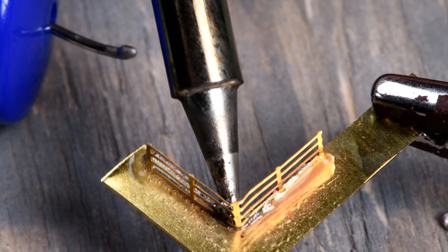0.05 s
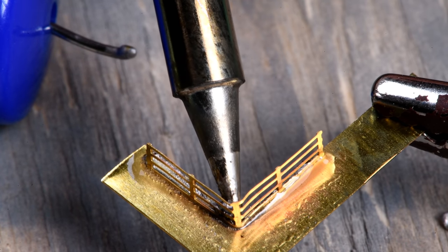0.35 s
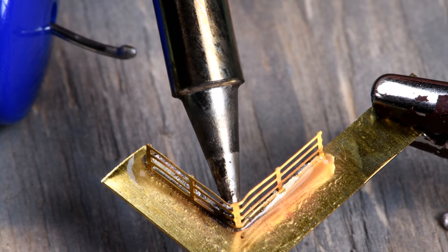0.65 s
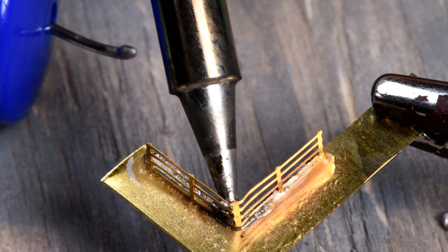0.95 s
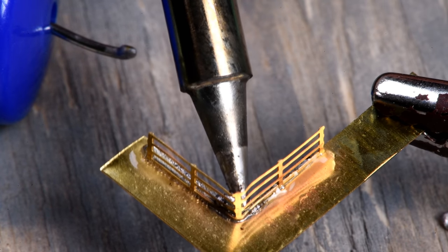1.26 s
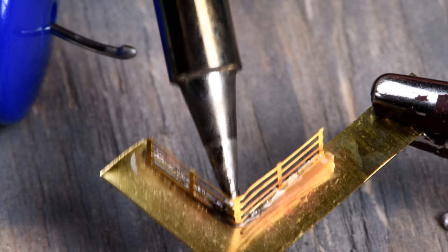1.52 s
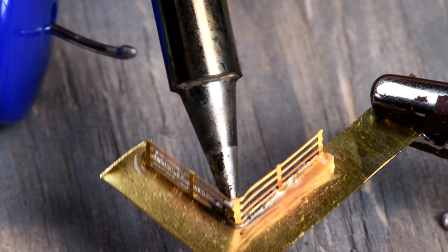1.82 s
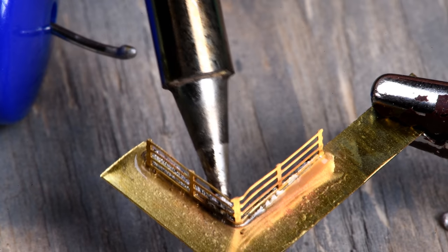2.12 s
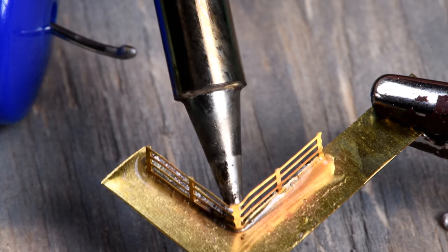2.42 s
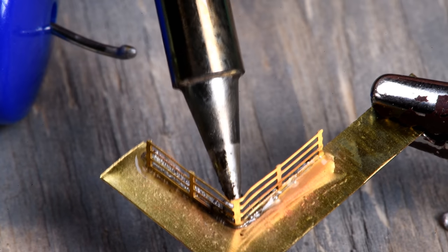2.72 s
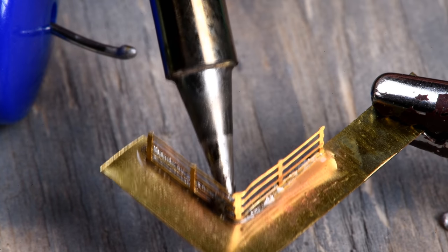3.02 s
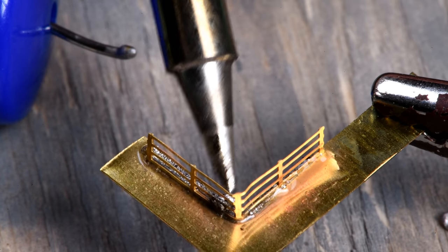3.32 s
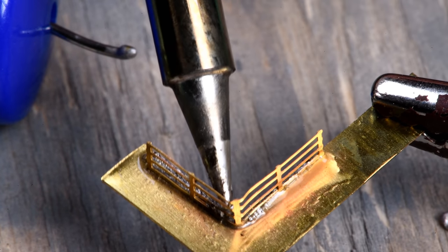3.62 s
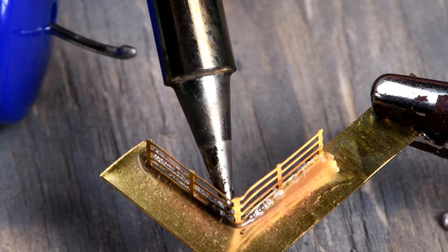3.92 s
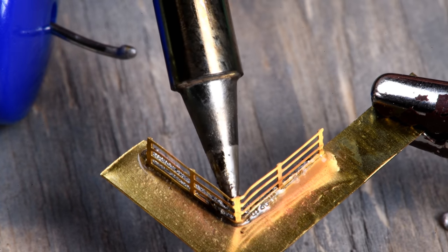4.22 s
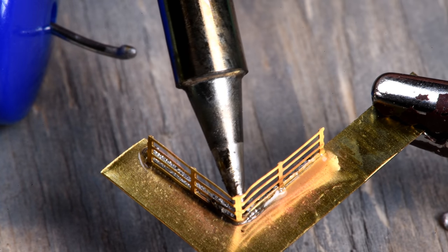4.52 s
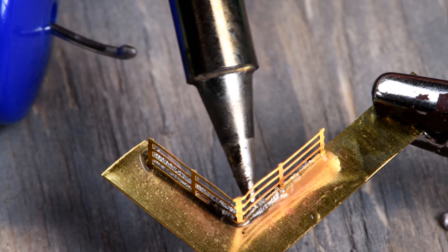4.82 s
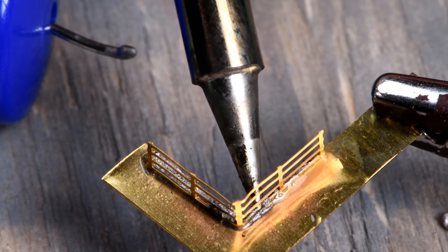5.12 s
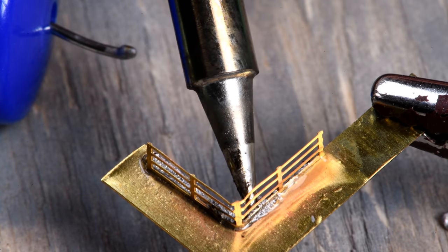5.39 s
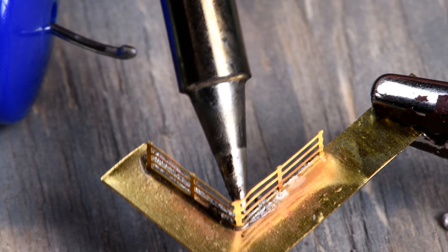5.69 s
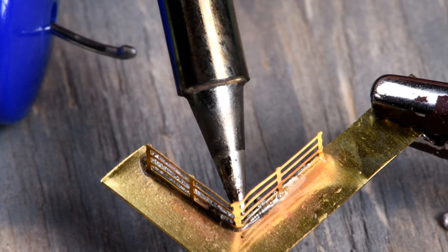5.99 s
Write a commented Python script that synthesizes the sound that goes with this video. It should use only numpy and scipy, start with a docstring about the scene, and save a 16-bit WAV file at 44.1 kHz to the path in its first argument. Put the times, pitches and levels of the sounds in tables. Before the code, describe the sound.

A low hum, faint hiss and very thin high whine fill a quiet workshop for about six seconds. Across the room a clock ticks faintly every 0.4 seconds, while a slower one knocks about once a second, with occasional stray clicks. Close to the microphone, soldering flux gives tiny high fizzes at 0.1, 2.2 and 3.2 seconds, and minute pops around 1 second and from 5 to 5.3 seconds. At 1.3 seconds the iron touches a brass strip with a sharp, bright click slightly to the right, together with a short knock on the bench. Softer bench bumps come at 0.3 and between 2.6 and 3.1 seconds. A barely audible deep drone swells around 3.4 and 4.6 seconds; the hum rises near 3.7 seconds and stays up. At 5.3 seconds comes the loudest sound, a hard snap nearby on the right, with a brief ring and short room echo.

```python
"""A low hum, a faint hiss and a quick clock ticking across a quiet room, heard from a workbench.
Close to the microphone a small brass part is being soldered: flux fizzes and pops, nudges set the
bench top ringing and the iron touches the brass. Farther off a slow clock knocks out tick and tock.
A deep drone swells twice and the machine hum rises and stays up. Near the end something hard snaps
on the right and the room answers."""
import sys
import numpy as np
from scipy import signal
from scipy.fft import rfft, irfft
from scipy.io import wavfile
from scipy.ndimage import uniform_filter1d

SR = 44100
rng = np.random.default_rng(int(sys.argv[2]) if len(sys.argv) > 2 else 0)


def materialize(psi):
    """Save the field psi as 16-bit PCM at rate SR to the path in sys.argv[1].

    A 1-D psi becomes a single channel; in a 2-D psi each row is a channel.
    """
    bounded = np.clip(np.atleast_2d(psi).T, -1, 1)
    quanta = np.round(bounded * 32767).astype(np.int16)
    wavfile.write(sys.argv[1], SR, quanta)


N = 271215
TIME = np.arange(N) / SR
EVENT_SAMPLES = SR // 2


def from_db(db):
    """Decibels to gain."""
    return 10 ** (np.asarray(db) / 20)


def pan(left_minus_right_db):
    """Stereo gains; negative lies to the microphone's right."""
    return from_db(left_minus_right_db * np.array([[.5], [-.5]]))


def rms_one(x):
    """Scale to rms 1."""
    return x / np.sqrt(np.mean(x ** 2) + 1e-30)


def energy_one(x):
    """Scale each channel to energy 1."""
    return x / np.sqrt(np.sum(x ** 2, axis=-1, keepdims=True) + 1e-30)


def at_hz(points, hz):
    """Read a table on a log-frequency axis."""
    f, value = np.transpose(points)
    return np.interp(np.log(hz), np.log(f), value)


def bins(size):
    """Frequencies of a real FFT, kept above zero."""
    return np.maximum(np.arange(size // 2 + 1) * SR / size, 1)


def add(out, s, sound):
    """Mix a sound in at time s."""
    i = min(max(round(s * SR), 0), N)
    out[:, i:i + sound.shape[-1]] += sound[..., :N - i]


def colour(x, gain):
    """Causal (minimum-phase) filter with the given gain per FFT bin."""
    size = x.shape[-1]
    cepstrum = irfft(np.log(gain + 1e-6), size)
    cepstrum[1:size // 2] *= 2
    cepstrum[size // 2 + 1:] = 0
    return irfft(rfft(x) * np.exp(rfft(cepstrum)), size)


def shaped(x, spectrum):
    """Give a sound a broad spectrum."""
    return colour(x, from_db(at_hz(spectrum, bins(x.shape[-1]))))


def resonate(x, modes):
    """Parallel resonances with alternating signs."""
    out = 0
    for k, (hz, width, db) in enumerate(modes):
        r = np.exp(-np.pi * width / SR)
        poles = [1, -2 * r * np.cos(2 * np.pi * hz / SR), r * r]
        ring = signal.lfilter([1, 0, -1], poles, x + 1e-18)
        out = out + (-1) ** k * from_db(db) * (1 - r * r) / 2 * ring
    return out


def fade(t60):
    """Exponential decay, 60 dB in t60 seconds."""
    return from_db(-np.minimum(60 * TIME[:EVENT_SAMPLES] / t60, 300))


def contact(t60):
    """A rough contact: a dying flurry of tiny impacts, energy 1."""
    return energy_one(rng.standard_normal(EVENT_SAMPLES) * fade(t60))


def wavering(hz, width_hz):
    """A hum line whose phase wanders; rms 1."""
    wander = np.cumsum(rng.standard_normal(N)) * np.sqrt(2 * np.pi * width_hz / SR)
    return np.sqrt(2) * np.sin(2 * np.pi * hz * TIME + uniform_filter1d(wander, size=SR // 50))


# Room sound at the microphone's two channels (f/Hz, left-right correlation)
CHANNEL_LIKENESS = [(60, 0.93), (130, 0.91), (290, 0.37), (640, 0.29), (1410, 0.28), (3100, 0.0089),
                    (15000, 0.0092)]
def diffuse(size=EVENT_SAMPLES):
    """White stereo noise as a room delivers it: alike in the bass, unrelated in the treble."""
    mid, side = rfft(rng.standard_normal((2, size)))
    alike = at_hz(CHANNEL_LIKENESS, bins(size))
    return irfft(np.sqrt(1 + alike) * mid + np.sqrt(1 - alike) * side * [[1], [-1]], size)


# The room's decay, heard from the bench (f/Hz, t60/s)
ROOM_DECAY = [(120, 0.37), (250, 0.5), (600, 0.28), (2000, 0.26), (5000, 0.32), (9000, 0.22), (15000, 0.24)]
def room():
    """Reverberation from one spot: each octave dies at its own rate; energy 1."""
    field = rfft(diffuse())
    octave = np.clip(np.log2(bins(EVENT_SAMPLES) / 125), 0, 7)
    tail = 0
    for k in range(8):
        band = irfft(field * np.maximum(1 - abs(octave - k), 0), EVENT_SAMPLES)
        tail = tail + band * fade(at_hz(ROOM_DECAY, 125 * 2 ** k))
    return energy_one(tail)


def at_microphone(sound, reverb, direct_db):
    """Straight path plus room, energy 1; a higher direct_db sounds nearer."""
    wet = signal.fftconvolve(sound[None], reverb, axes=1)[:, :len(sound)]
    return energy_one(wet + from_db(direct_db) * sound)


# The building, all around the microphone (f/Hz, relative level/dB)
RUMBLE_SPECTRUM = [(15, -24.5), (28, -10), (40, -2.5), (52, -10), (75, 0), (100, -6.5), (135, -3.5),
                   (155, -5), (178, -14.5), (250, -12), (330, -18), (600, -20.5), (900, -59.5)]
def building_rumble(db=-56.5):
    """Steady low noise fills the room."""
    return from_db(db) * rms_one(shaped(diffuse(N), RUMBLE_SPECTRUM))


# Steady hum lines in the room (f/Hz, level/dB)
HUM_LINES = [(42, -68), (146, -69)]
def machine_hum(hz=71.2, quiet_db=-70.5, loud_db=-59, swell_s=3.66, rise_s=.39):
    """The machine's main hum swells once and stays up, over fainter steady lines."""
    risen = np.clip((TIME - swell_s) / rise_s, 0, 1)
    main = from_db(quiet_db + (loud_db - quiet_db) * risen) * wavering(hz, width_hz=3.6)
    return main + sum(from_db(db) * wavering(f, width_hz=5.2) for f, db in HUM_LINES)


# The microphone's noise floor (f/Hz, relative level/dB)
HISS_SPECTRUM = [(180, -25), (300, -9.5), (348, -3), (379, -9.5), (528, -11), (624, -8), (667, -2.5),
                 (774, -5.5), (961, -6.5), (1040, -7.5), (2140, -9.5), (2440, -9.5), (6520, -11.5),
                 (11700, -12), (16000, -11.5)]
def microphone_hiss(db=-57):
    """Faint, steady broadband noise."""
    return from_db(db) * rms_one(shaped(diffuse(N), HISS_SPECTRUM))


# Whine in both channels (f/Hz, width/Hz, relative level/dB)
WHINE_BANDS = [(11500, 160, 14), (11870, 180, 9), (15400, 300, -11)]
def electrical_whine(db=-73):
    """Narrow bands of noise make a thin, high whine."""
    return from_db(db) * rms_one(resonate(rng.standard_normal((2, N)), WHINE_BANDS))


# Quick clock across the room, contacts of its first beat (t/s, level/dB, rattle t60/s)
QUICK_CONTACTS = [(.020, -31.5, .05), (.038, -26.5, 0.032), (.047, -32, 0.02)]
# Its case (f/Hz, width/Hz, relative level/dB)
QUICK_CASE_MODES = [(794, 81, -1.5), (1310, 16, 10), (1816, 97, -1), (2130, 190, -5), (3310, 65, -1),
                    (3560, 77, -3), (3670, 280, -6.5)]
def quick_clock(period_s=.4, vary_db=.6, rattle=.6):
    """On every beat the escapement strikes the same small case and rattles briefly."""
    out, impact = np.zeros((2, N)), signal.unit_impulse(EVENT_SAMPLES)
    for s, db, t60 in QUICK_CONTACTS:
        reverb = room()
        for start in np.arange(0, N / SR, period_s):
            tick = resonate(impact + rattle * contact(t60), QUICK_CASE_MODES)
            gain = from_db(db + vary_db * rng.normal())
            add(out, start + s, gain * at_microphone(tick, reverb, direct_db=-5))
    return out


# Fizzes at the hot joint, close to the microphone (t/s, level/dB, f/Hz)
FLUX_FIZZES = [(.130, -30, 14000), (2.215, -32, 12400), (3.185, -33, 12400)]
# Single pops there (t/s, level/dB)
FLUX_POPS = [(.952, -34), (4.995, -37), (5.192, -32), (5.284, -33)]
def boiling_flux(fizz_t60=.065, pop_t60=.004, pop_hz=14000, width_hz=3000):
    """Flux boils off in tiny bursts of high noise."""
    out = np.zeros((2, N))
    fizzes = [(s, db, fizz_t60, hz) for s, db, hz in FLUX_FIZZES]
    pops = [(s, db, pop_t60, pop_hz) for s, db in FLUX_POPS]
    for s, db, t60, hz in fizzes + pops:
        burst = resonate(diffuse() * fade(t60), [(hz, width_hz, 0)])
        add(out, s, from_db(db) * energy_one(burst))
    return out


def struck(events, modes, direct_db, tick_db, impact):
    """An impact and a scrape give a dry tick and ring a body; soft contacts miss the high modes."""
    out, reverb = np.zeros((2, N)), room()
    for s, db, t60, bright_hz in events:
        tick = energy_one(impact * signal.unit_impulse(EVENT_SAMPLES) + contact(t60))
        lowpass = 1 / np.hypot(1, (bins(EVENT_SAMPLES) / bright_hz) ** 2)
        body = resonate(colour(tick, lowpass), modes) + from_db(tick_db) * tick
        add(out, s, from_db(db) * at_microphone(body, reverb, direct_db))
    return out


# Nudges to the bench, near the microphone (t/s, level/dB, push t60/s, brightness f/Hz)
BENCH_NUDGES = [(.320, -28, 0.26, 217), (1.320, -21, .04, 500), (1.339, -13.5, 0.012, 910),
                (1.360, -17, 0.046, 1510), (2.650, -29, .04, 600), (2.715, -29, 0.15, 240),
                (2.775, -27.5, 0.09, 230), (3.036, -21.5, .09, 258), (3.085, -23, 0.05, 1200)]
# The bench top (f/Hz, width/Hz, relative level/dB)
BENCH_MODES = [(104, 38, 1.5), (208, 25, 5), (281, 34, 3), (344, 180, -2.5), (413, 45, 3),
               (482.4, 11, 14.5), (581, 8.5, 9), (644, 18, 7), (760, 57, -4)]
def bench_nudges():
    """Soft pushes stir the low modes of the bench top."""
    return struck(BENCH_NUDGES, BENCH_MODES, direct_db=7, tick_db=-42, impact=.99)


# Slow clock across the room, first tick and tock (t/s, level/dB, rattle t60/s, f/Hz, width/octaves)
SLOW_CONTACTS = [(.910, -26, 0.064, 1010, .53), (.986, -21, 0.016, 1580, 1.03),
                 (.998, -28.5, .04, 2000, 1.3), (1.012, -27, 0.086, 1250, 0.36),
                 (1.905, -30.5, 0.042, 2180, 0.16), (1.930, -25.5, .11, 890, 0.38),
                 (1.952, -23, 0.05, 1660, 2)]
# Its odd gear slips (same columns)
GEAR_SLIPS = [(.535, -29, .076, 2240, .2), (2.535, -32, 0.12, 2180, 0.25), (4.618, -27.5, 0.04, 2120, 0.14),
              (5.69, -29, .51, 1370, .08)]
# Its case (f/Hz, width/Hz, relative level/dB)
SLOW_CASE_MODES = [(724, 75, -21), (940, 110, -2), (1110, 140, -4.5), (1320, 250, -6), (1510, 160, -1),
                   (1570, 120, 1.5), (1803, 105, -1), (2330, 190, -4), (2330, 73, -2), (3000, 220, -10.5),
                   (3370, 150, -11), (5100, 730, -12)]
def slow_clock(period_s=2.0, variation=.59):
    """Gears knock on the case in the same order, a little differently each cycle, and sometimes slip."""
    out, reverb = np.zeros((2, N)), room()
    cycles = np.arange(0, N / SR, period_s)
    for knocks, starts in [(SLOW_CONTACTS, cycles), (GEAR_SLIPS, [0])]:
        for s, db, t60, hz, octaves in knocks:
            usual = contact(t60)
            band = 1 / (1 + (np.log2(bins(EVENT_SAMPLES) / hz) / octaves) ** 2)
            for start in starts:
                knock = colour(usual + variation * contact(t60), band)
                case = resonate(knock, SLOW_CASE_MODES)
                add(out, start + s, from_db(db) * at_microphone(case, reverb, direct_db=-9))
    return out


# The iron's touches, close up and a little right (t/s, level/dB, scrape t60/s, brightness f/Hz)
IRON_TOUCHES = [(1.3368, -3.5, 0.019, 16300), (1.3385, -9, 0.072, 16400), (3.036, -26, 0.049, 3020)]
# The brass strip (f/Hz, width/Hz, relative level/dB)
BRASS_MODES = [(1750, 450, -28), (3892, 120, -25), (5450, 600, -20), (6218, 120, -24), (6767, 200, -22),
               (8829, 100, -19), (10100, 600, -21), (11780, 150, -15), (14050, 400, -10), (15000, 500, -6),
               (15650, 200, 5)]
def iron_on_brass(pan_db=-4.5):
    """The iron scrapes the strip, which rings high and briefly."""
    return struck(IRON_TOUCHES, BRASS_MODES, direct_db=27, tick_db=-35, impact=.3) * pan(pan_db)


# Swells of the room's deepest tone (t/s, length/s, top level/dB)
DRONE_ARCHES = [(2.964, 0.8, -59), (4.38, 0.43, -61)]
def drone(hz=41.5):
    """A deep tone rises and sinks in smooth arches."""
    level = 0
    for s, length, db in DRONE_ARCHES:
        progress = np.clip((TIME - s) / length, 0, 1)
        level = level + from_db(db) * np.sin(np.pi * progress)
    return level * wavering(hz, width_hz=2.9)


# A snap nearby on the right, with echoes off bench and wall
# (t/s, relative level/dB, t60/s, left minus right/dB)
SNAP_ARRIVALS = [(5.3436, 4, .006, -10), (5.3443, 1, .005, -8), (5.3485, -2, .006, -2),
                 (5.3527, 0, .007, 5)]
# Its crack, then its scatter and tail, at the microphone (f/Hz, relative level/dB)
CRACK_SPECTRUM = [(59, -41), (100, -19), (570, -3), (950, -10), (1610, -28), (1910, 1), (2800, -15),
                  (3540, 1), (5900, -4), (7770, 2), (9410, 1), (10500, 3.5), (16000, 7)]
TAIL_SPECTRUM = [(59, -16), (100, -28), (140, -13), (255, -11), (492, -9.5), (558, -5.5), (1100, -9.5),
                 (1310, -5), (1420, -4), (1650, -10), (2080, -0.5), (2690, -6.5), (6020, -4.5),
                 (7940, -11.5), (16000, -7)]
# What rings after it, and the low room modes it stirs (f/Hz, width/Hz, relative level/dB)
RING_MODES = [(802, 18, 6), (1020, 39, 6.5), (1394, 26, 5), (1456, 33, 2.5), (2070, 28, -11), (2100, 25, 0),
              (2640, 24, 5), (2650, 26, -12), (3030, 58, 6), (3400, 41, 8), (3500, 59, 0), (4210, 24, -16),
              (4640, 33, -5), (5040, 30, -8), (6170, 38, -11), (10600, 84, 9), (14900, 150, -1)]
BOOM_MODES = [(165, 7.1, 0), (250.5, 4.3, 2.5), (267.5, 22, -6.5)]
def snap(crack_db=2, early_db=8.5, ring_db=4, tail_db=6, boom_db=-10, scatter_pan_db=-4):
    """A hard crack, dense scatter from the things on the bench, a short ring and the room's tail."""
    out, impulse = np.zeros((2, N)), signal.unit_impulse(EVENT_SAMPLES)
    for s, db, t60, pan_db in SNAP_ARRIVALS:
        crack = energy_one(shaped(diffuse() * fade(t60), CRACK_SPECTRUM))
        add(out, s, from_db(crack_db + db) * crack * pan(pan_db))
    arriving = 1 - fade(t60=.038)   # reflections take a few milliseconds to build up
    scatter = energy_one(diffuse() * fade(t60=.076) * arriving)
    early = from_db(early_db) * energy_one(shaped(scatter, TAIL_SPECTRUM))
    ring = from_db(ring_db) * at_microphone(resonate(impulse, RING_MODES), scatter, direct_db=-3)
    tail = from_db(tail_db) * energy_one(shaped(room() * arriving, TAIL_SPECTRUM))
    boom = from_db(boom_db) * energy_one(resonate(impulse, BOOM_MODES))
    add(out, SNAP_ARRIVALS[0][0], (early + ring) * pan(scatter_pan_db) + tail + boom)
    return out


def scene():
    """From the bench: close handling a little to the right, far clocks, room tone all around."""
    clocks = quick_clock() + slow_clock()
    near = iron_on_brass() + bench_nudges() + snap() + boiling_flux()
    room_tone = building_rumble() + machine_hum() + microphone_hiss() + electrical_whine() + drone()
    return near + (clocks + room_tone) * pan(-.5)


def record(dry, cutoff_hz=16000):
    """Peaks stop at full scale and the top is cut."""
    lowpass = signal.ellip(12, .1, 70, cutoff_hz, fs=SR, output="sos")
    return signal.sosfilt(lowpass, np.clip(dry, -1, 1))


dry = scene()
out = record(dry)
materialize(out)
```